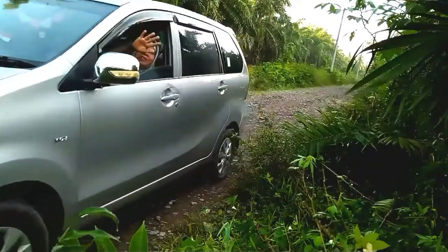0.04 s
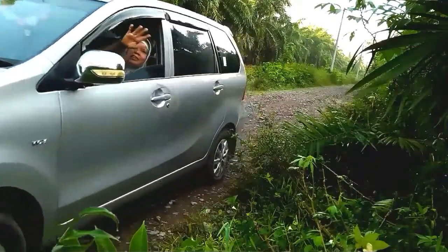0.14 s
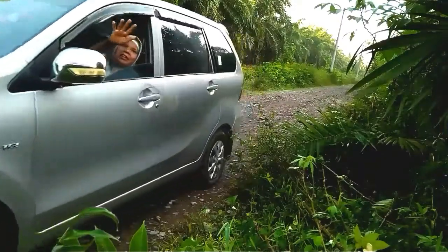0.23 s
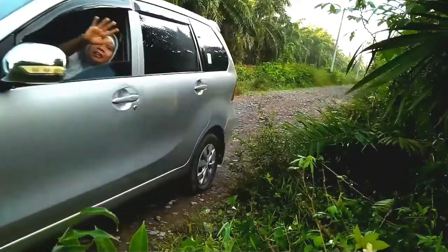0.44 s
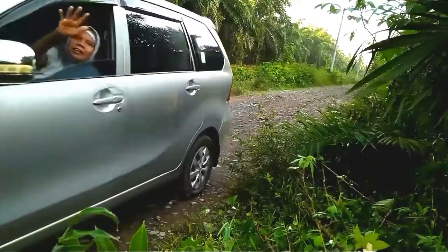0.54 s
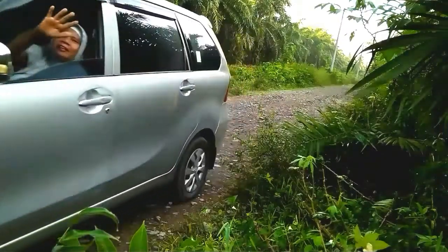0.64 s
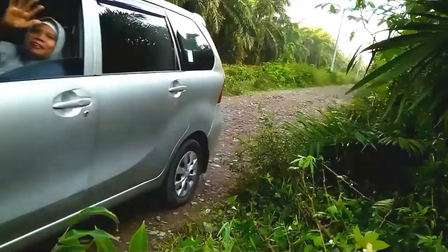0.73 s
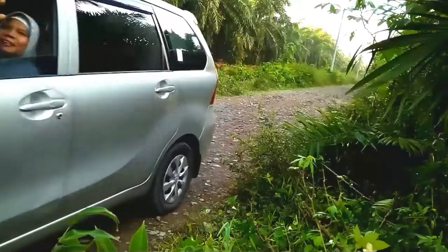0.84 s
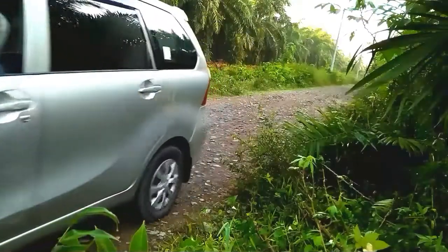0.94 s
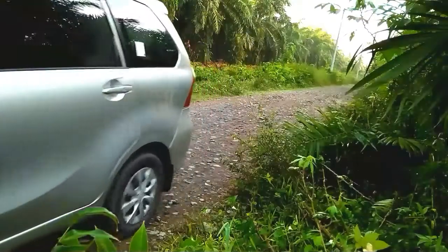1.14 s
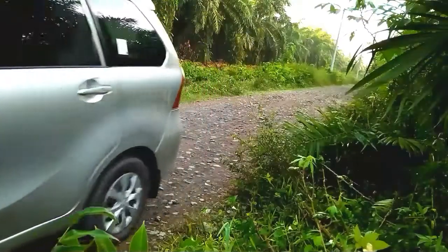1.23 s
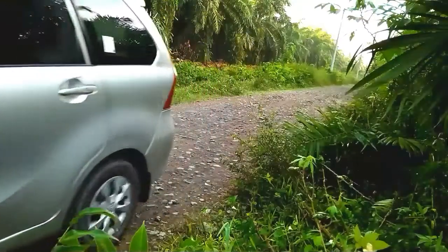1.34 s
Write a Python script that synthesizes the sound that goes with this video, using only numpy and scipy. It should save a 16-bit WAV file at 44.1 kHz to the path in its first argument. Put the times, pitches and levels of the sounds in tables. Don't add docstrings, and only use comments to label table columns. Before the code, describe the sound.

A car horn toots three times very close, two short then one longer, bright, buzzing and overloaded. Brief echoes come off ground and trees, while tyres pop softly on gravel outdoors, captured by a close stereo microphone.

```python
import sys
import numpy as np
from scipy import signal
from scipy.io import wavfile
from scipy.ndimage import uniform_filter1d

SR = 44100
rng = np.random.default_rng(int(sys.argv[2]) if len(sys.argv) > 2 else 0)


def natural_amplitude(level_db):
    exponent = np.asarray(level_db, float) / 20
    return 10 ** exponent


def output_pcm(signal):
    pcm = np.clip(np.atleast_2d(signal).T, -1, 1) * 32767
    wavfile.write(sys.argv[1], SR, np.round(pcm).astype(np.int16))


N = 61739
STEP = 32


def evened(x):
    return x / np.sqrt(np.mean(abs(x) ** 2) + 1e-20)


def column(table, index):
    rows = np.array(table, float)
    return np.interp(np.arange(N) / SR, rows[:, 0], rows[:, index])


def sides(pan_db):
    return natural_amplitude(np.array([pan_db / 2, -pan_db / 2]))


def resonate(x, hz, width):
    return signal.lfilter(*signal.iirpeak(hz, hz / width, SR), x)


def wander(width_hz, count):
    shape = (2, count, N // STEP + 2)
    z = rng.standard_normal(shape) + 1j * rng.standard_normal(shape)
    hz = np.fft.fftfreq(shape[2], STEP / SR)
    return evened(np.fft.ifft(np.fft.fft(z) / (1 + (hz / width_hz) ** 4)))


# start t/s, end t/s, level/dB, disc phase left-right/rad
TOOTS = [
    (0.223, 0.323, -3.5, -0.079),
    (0.428, 0.557, -2.5, -0.59),
    (0.739, 1.057, -1, -1.76),
]


def hammering():
    t = np.arange(N) / SR
    attack_s, stop_s = 0.0077, 0.0084
    near, near_t60_s = natural_amplitude(-3.5), 0.2
    far_db, far_t60_s = -20, 0.43
    level, lag = np.zeros(N), np.zeros(N)
    rattle = natural_amplitude(-16) * np.ones(N)
    direct = 0.3 * np.ones(N)
    for start, end, level_db, phase in TOOTS:
        after = np.maximum(t - end, 0)
        tail = (1 - near) * np.exp(-(after / stop_s) ** 2)
        tail += near * natural_amplitude(-60 * after / near_t60_s)
        tail += natural_amplitude(far_db - 60 * after / far_t60_s)
        level += natural_amplitude(level_db) * np.clip((t - start) / attack_s, 0, 1) * tail
        lag[t >= start] = phase
        rattle += natural_amplitude(-5) * (t > start) * np.exp(-abs(t - start) / 0.022)
        rattle += natural_amplitude(-8) * np.exp(-abs(t - end) / np.where(t < end, 0.005, 0.08))
        direct[(t >= start) & (t < end)] = 1
    return level, lag, rattle, direct


# t/s, level below/dB, level above/dB, level two above/dB, phase above left-right/rad
BESIDE = [(.225, -4, 8, 1.5, -2.5), (.27, -1, -4, 2, -3.5), (.31, 5.5, 6.5, 2.5, -3.5),
          (.36, 9.5, 2.5, 0.5, -3), (.43, -1.5, 2, -0.5, -3.7), (.47, 5, 4, -3, -1), (.52, 1.5, 6, 4, -1.9),
          (.555, 6, -3, -1, -2), (.575, 0.5, 8, 0.5, -.8), (.65, -7.5, -1.5, -7, -0.3),
          (.75, -2, -0.5, -4, -3.5), (.81, 3.5, -4, -2, -1.1), (.855, -4, -12, -1.5, -4.5),
          (.885, -2, -10, 3, 0), (.918, 2, -8, -5, -3.5), (.945, -8.5, -5.5, -1.5, -4.5),
          (.975, -9.5, -0.5, -6.5, -1.9), (1.01, -8.5, 2, 5, -2), (1.04, -10, 0, -0.5, -3),
          (1.065, -3.5, 6.5, -0.5, -2.7), (1.1, 1.5, 0, 2.5, -.1)]


def echo_paths(k, hz, at, lag, rattle, direct):
    firm = 0.4 + np.exp(-((hz - 2930) / 250) ** 2)
    firm = firm + 0.45 * (abs(hz - 3150) < 800) + 0.4 * (abs(hz - 11100) < 400)
    steady = np.clip(firm, 0, 0.95) * np.maximum(uniform_filter1d(direct, size=900)[at], 0.9 * (k == 7))

    half = np.array([0.5, -0.5])[:, None, None]
    turns = rng.random((2, len(k), 1))
    turns = np.where(abs(k - 7.5) < 2, turns[0], turns)
    apart = (k == 7) * lag[at] + (k == 8) * column(BESIDE, index=4)[at] + (k == 9) * -3
    place = np.exp(2j * np.pi * turns + 1j * half * apart)

    fizz_hz = 12000
    smear = rattle[at] + natural_amplitude(-9) * (direct[at] < 1) * (hz > fizz_hz / 2)
    smear = smear * hz / 11000
    smear = smear + natural_amplitude(-11) * (hz > fizz_hz) + natural_amplitude(0.5) * (hz < 1900)
    shifting = wander(15, count=len(k)) + natural_amplitude(-6) * wander(55, count=len(k))
    return steady * place + np.sqrt(1 - steady ** 2) * shifting + smear * wander(170, count=len(k))


# t/s, level/dB, left-right level/dB
DISC = [(.224, 9, 5), (.25, 11.5, 10), (.31, 4, 0), (.35, -23, 23), (.43, 3.5, -1), (.48, -0.5, 2),
        (.54, 3.5, 1.5), (.562, -14.5, 19), (.6, 1, 12.5), (.655, -6.5, -5), (.745, -1.5, -4.5),
        (.785, -10, 17), (.84, -2.5, 7.5), (.885, -11, 11.5), (.912, 0, 11), (.95, -6, 1), (1.045, 4, 4),
        (1.09, -10, -1)]
# t/s, centre f/Hz, level/dB, left-right level/dB
SHRILL = [(.225, 11500, -2, -12), (.26, 11200, 8, 2), (.3, 11040, 15.5, 3), (.33, 11420, 5, 6),
          (.43, 10900, 7, 8.5), (.47, 11440, 9, -1), (.51, 10900, 3.5, 3.5), (.55, 11630, 1.5, -4),
          (.6, 11600, 4.5, 19.5), (.745, 11260, 8, 1.5), (.8, 10830, 2.5, 0.5), (.86, 12100, 1.5, -2),
          (.92, 11070, 5, -2), (.98, 11400, 4.5, -2), (1.04, 11400, 1.5, -5.5), (1.09, 11650, 6.5, 6.5)]


def turning_db(k, hz, at):
    half = np.array([0.5, -0.5])[:, None, None]
    ring = np.exp(-((hz - 2780) / 330) ** 2)
    disc_db = column(DISC, index=1)[at] + half * column(DISC, index=2)[at]
    beside_db = sum((k == near_k) * column(BESIDE, index=j)[at] for j, near_k in ((1, 6), (2, 8), (3, 9)))
    beam = np.exp(-((hz - column(SHRILL, index=1)[at]) / 510) ** 2)
    shrill_db = column(SHRILL, index=2)[at] + half * column(SHRILL, index=3)[at]
    return ring * disc_db + beside_db + beam * shrill_db


# t/s, f/Hz
PITCH = [(.23, 418.2), (.265, 417.1), (.3, 418.7), (.33, 419.5), (.4, 418.6), (.44, 417.8), (.475, 417.4),
         (.51, 418.8), (.57, 419.8), (.72, 419.8), (.75, 418.0), (.8, 419.0), (1.04, 418.7), (1.085, 420.3)]
# multiple of the buzz rate, level/dB
STACK = [(1, -6), (2, -32.5), (3, -38), (4, -28), (5, -33.5), (6, -11), (7, 2.5), (8, -6.5), (9, -11.5),
         (10, -23.5), (11, -20), (12, -15), (13, -18), (14, -18), (15, -22), (16, -18.5), (17, -15),
         (18, -14), (19, -6.5), (20, -6), (21, -7), (22, -5), (23, -3.5), (24, 4), (25, -4.5), (26, 0),
         (27, -6.5), (28, -7), (29, -34.5), (30, -8), (31, -21), (32, -25.5), (33, -10.5), (34, -15.5),
         (35, -19.5), (36, -23), (37, -11.5)]


def buzz():
    level, lag, rattle, direct = hammering()
    k, db = np.transpose(STACK[1:])[:, :, None]
    hz = k * PITCH[0][1]
    at = np.minimum(np.arange(N // STEP + 2) * STEP, N - 1)
    paths = echo_paths(k, hz, at, lag, rattle, direct) * natural_amplitude(db + turning_db(k, hz, at))

    i, share = np.arange(N) // STEP, np.arange(N) % STEP / STEP
    spin = np.exp(2j * np.pi * k * np.cumsum(column(PITCH, index=1)) / SR)
    tones = (paths[..., i] * spin).real.sum(axis=1) * (1 - share)
    tones += (paths[..., i + 1] * spin).real.sum(axis=1) * share
    return level * tones / np.linalg.norm(natural_amplitude(db))


# t/s, f/Hz, level/dB, left-right level/dB
HUM = [
    [(0.21, 416.4, -104, 65), (0.222, 416, -17.5, 3.5), (0.286, 417.9, -25, 0), (0.306, 400, -29.5, -4),
     (0.334, 404.7, -18, 8.5), (0.368, 436, -32.5, 0), (0.382, 431, -24.5, 4), (0.416, 447, -53, -2),
     (0.42, 440, -1, 1)],
    [(0.42, 416.8, -40, 2), (0.428, 428, -17.5, 5), (0.496, 417.9, -28, 3), (0.546, 394, -25, -3),
     (0.566, 409.5, -14, -1), (0.588, 409, -24.5, 13), (0.622, 454, -33.5, -2), (0.645, 446, -40.5, 9),
     (0.67, 462, -68, 4.0)],
    [(0.725, 419.9, -31, 1), (0.733, 412.4, -22, 2), (0.743, 430, -14, 3), (1.033, 393, -20, 0),
     (1.085, 407, -21.5, 6.5), (1.113, 396, -39.5, 0), (1.127, 430, -29, 2), (1.149, 472, -51.5, 11),
     (1.2, 405, -66.5, 22)],
]


def hum():
    t, out = np.arange(N) / SR, np.zeros((2, N))
    held = sum((t > start) & (t < end) for start, end, *_ in TOOTS)
    side_lag = np.array([[0], [1]])
    for rows in HUM:
        hz = np.where(held, column(PITCH, index=1), column(rows, index=1))
        fade_in = np.clip((t - rows[0][0]) / 0.014, 0, 1)
        fade_out = np.clip((rows[-1][0] - t) / 0.0085, 0, 1)
        tone = np.sqrt(2) * np.sin(2 * np.pi * np.cumsum(hz) / SR + side_lag)
        out += fade_in * fade_out * natural_amplitude(column(rows, index=2)) * sides(column(rows, index=3)) * tone
    return out


# f/Hz, width f/Hz, level/dB
PANELS = [
    (682, 12, 10.5),
    (906, 100, 5.5),
    (1270, 24, -5.5),
    (1376, 26, -12.5),
    (1720, 36, -4),
    (1900, 90, 1),
]


def panels():
    t, noise = np.arange(N) / SR, rng.standard_normal((2, 2, N))
    shake_t60_s, jolt_t60_s = 0.8, 0.35
    shake = sum((t > a) * natural_amplitude(-60 * np.maximum(t - b, 0) / shake_t60_s) for a, b, *_ in TOOTS)
    jolt = sum((t > a) * natural_amplitude(-60 * abs(t - a) / jolt_t60_s) for a, *_ in TOOTS)

    rings = 0
    for hz, width, db in PANELS:
        rings = rings + natural_amplitude(db) * evened(resonate(resonate(noise[0], hz, width), hz, 2 * width))
    wide = evened(resonate(resonate(noise[0], 1100, 1200), 1100, 1200))
    low = evened(signal.lfilter(*signal.butter(2, 220, fs=SR), noise[1]))
    ringing = natural_amplitude(-43) * shake * (evened(rings) + natural_amplitude(5) * wide)
    return ringing + (natural_amplitude(-37) * jolt + natural_amplitude(-49.5) * shake) * low


# t/s, peak level/dB, pitch f/Hz, fall by 60 dB t/s
STONES = [(.001, -39, 72.6, 0.069), (.002, -44, 260, 0.07), (.002, -29.5, 520, 0.034),
          (.007, -27, 683, 0.034), (0.132, -53, 523, 0.026), (.19, -40, 693, 0.9),
          (0.5584, -5.5, 1390, 0.019), (0.5587, -7, 1010, 0.023), (0.5585, -6.5, 743, 0.02),
          (.559, -16.5, 1630, 0.026), (.56, -29.5, 685, 0.49), (.56, -31, 911, .4),
          (.674, -28.5, 768, 0.068), (.681, -25.5, 612, 0.072), (.692, -29, 804, 0.052),
          (1.117, -13.5, 740, 0.0027), (1.134, -25, 1500, 0.019), (1.136, -17.5, 1900, 0.006),
          (1.136, -25, 786, 0.0045), (1.201, -36.5, 542, 0.14), (1.226, -26, 165.6, 0.055),
          (1.237, -32, 261, 0.14), (1.254, -28, 109, 0.076), (1.267, -25.5, 76.8, 0.052),
          (1.299, -35.5, 70.9, 0.087), (1.321, -37.5, 100, .06), (1.385, -33, 66.2, 0.15)]


def gravel():
    out, t = np.zeros((2, N)), np.arange(6000) / SR
    for s, peak_db, hz, t60 in STONES:
        grit = rng.standard_normal((2, len(t)))
        grit = evened(resonate(resonate(grit, hz, hz * 0.45), hz, hz * 0.45))
        envelope = natural_amplitude(peak_db - 60 * t / t60) * np.minimum(t / t60 * 30, 1)
        knock = envelope * (0.6 * np.sin(2 * np.pi * hz * t) + 0.45 * grit)
        part = out[:, round(s * SR):][:, :len(t)]
        part += sides(5.5)[:, None] * knock[:, :part.shape[1]]
    return out


def idle():
    firing_hz = 95
    waver = 1 + natural_amplitude(-10.5) * wander(13, count=1)[0, 0, np.arange(N) // STEP]
    return natural_amplitude(-62) * (waver * np.exp(2j * np.pi * firing_hz * np.arange(N) / SR)).real


# f/Hz, level per Hz/dB
AIR = [
    (45, -11),
    (95, -10),
    (140, -14),
    (550, -5),
    (1500, -24),
    (6000, -24),
    (10500, -19),
    (15000, -38),
]
# f/Hz, likeness (1 = same)
AIR_SAME = [
    (60, 0.76),
    (380, 1),
    (2360, -0.08),
    (14800, 0.44),
]


def air():
    frames, hz = N // 256 + 5, np.fft.rfftfreq(1024, 1 / SR)

    def read(table):
        table_hz, value = np.transpose(table)
        return np.interp(np.log(hz + 1), np.log(table_hz), value)[:, None]

    a, b, c, d, patches = rng.standard_normal((frames, 513, 5)).T
    patches = evened(uniform_filter1d(uniform_filter1d(patches, size=14, axis=0), size=6, axis=1))
    same = np.clip(read(AIR_SAME), -1, 1)
    left = a + 1j * b
    right = same * left + np.sqrt(1 - same ** 2) * (c + 1j * d)
    z = np.array([left, right]) * natural_amplitude(read(AIR) + 2.5 * patches)
    wash = evened(signal.istft(z, nperseg=1024, noverlap=768)[1][:, :N])
    drift_db = -1 * np.arange(N) / SR
    return natural_amplitude(-52 + drift_db) * sides(3)[:, None] * wash


def scene():
    return buzz() + hum() + panels() + gravel() + idle() + air()


def low_pass(x):
    return signal.sosfilt(signal.butter(12, 15650, fs=SR, output="sos"), x)


def record(dry):
    ceiling = 0.9
    fine = np.clip(signal.resample_poly(dry, 3, 1, axis=1), -ceiling, ceiling)
    mix = signal.resample_poly(fine, 1, 3, axis=1)
    return low_pass(mix)


dry = scene()
out = record(dry)
output_pcm(out)
```